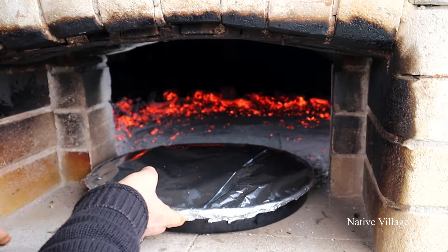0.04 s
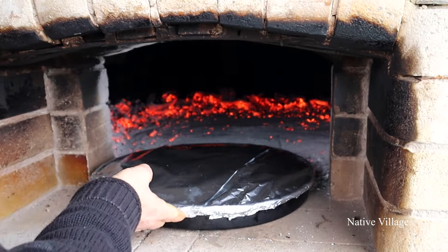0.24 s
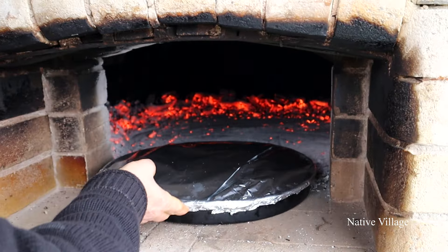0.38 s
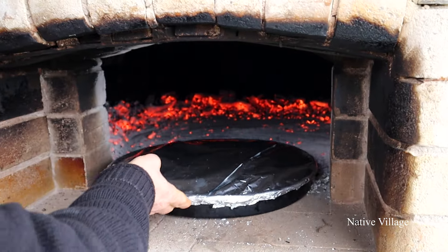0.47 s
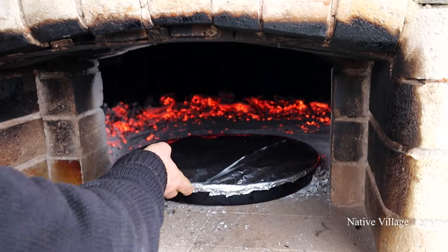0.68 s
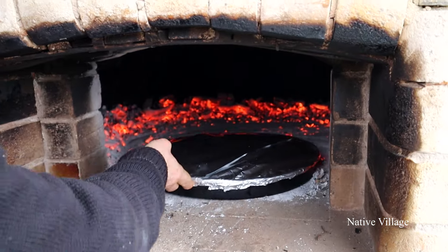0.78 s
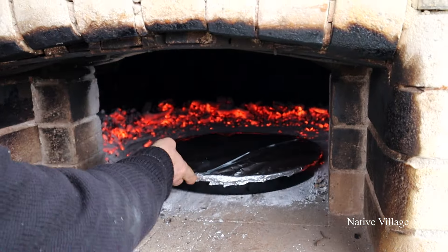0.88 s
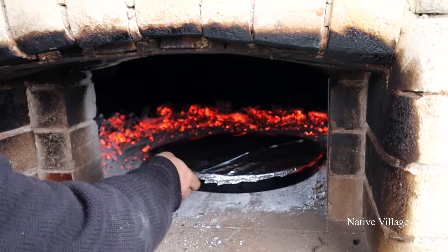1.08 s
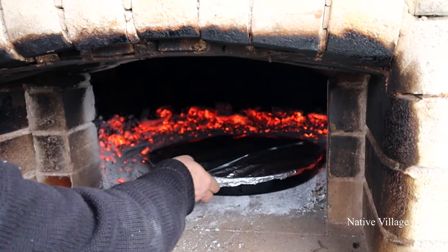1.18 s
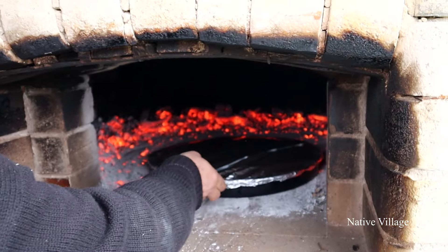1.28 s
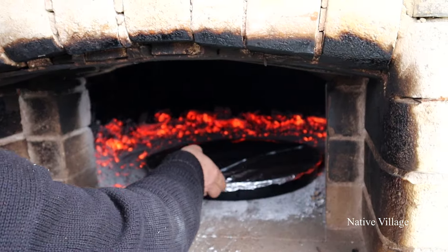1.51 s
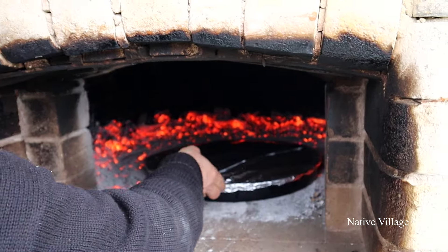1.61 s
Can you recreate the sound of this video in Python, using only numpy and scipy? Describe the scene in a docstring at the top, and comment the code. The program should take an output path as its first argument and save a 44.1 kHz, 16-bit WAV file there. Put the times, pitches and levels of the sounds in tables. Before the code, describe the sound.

Close up in a quiet room, a metal pan slides into a brick oven with one gritty, hissing scrape, full of small crunches, bumps and faint ringing. Soft cloth swishes come before and after it, over a low hum.

```python
"""A heavy metal pan is pushed over the ashy floor of a brick oven, close to the microphones.
Grit breaks under it in thousands of tiny clicks that growl, grind and hiss. The pan catches on
the bricks, judders, rings faintly and comes to rest, and the oven's arched roof echoes briefly.
A sleeve rustles before and after, over a quiet room with a low hum."""
import sys
import numpy as np
from scipy import signal
from scipy.fft import rfft, irfft, next_fast_len
from scipy.io import wavfile

SR = 44100
rng = np.random.default_rng(int(sys.argv[2]) if len(sys.argv) > 2 else 0)


def master_out(mix):
    """Clip the mix to full scale and print it as 16-bit PCM to the path in sys.argv[1]."""
    frames = np.transpose(np.atleast_2d(mix))
    ceiling = np.clip(frames, -1, 1)
    pcm = np.round(ceiling * 32767).astype(np.int16)
    wavfile.write(sys.argv[1], SR, pcm)


N = 72765
T = np.arange(N) / SR
FFT_SIZE = next_fast_len(N + 16384)
HZ = np.fft.rfftfreq(FFT_SIZE, 1 / SR)

# How loud the three parts of the scrape are. Each row: time in seconds, level in dB.
GRIND_LEVELS = [(.13, -54.5), (.19, -43.5), (.235, -36), (.295, -36.5), (.365, -34.5), (.41, -36),
                (.47, -35), (.495, -40), (.6, -33.5), (.685, -35), (.745, -31.5), (.775, -29.5),
                (.82, -27.5), (.855, -31), (.885, -29.5), (.915, -29.5), (.97, -30.5), (1.035, -32.5),
                (1.09, -42.5), (1.14, -50.5), (1.21, -85)]
HISS_LEVELS = [(.14, -58), (.175, -42.5), (.215, -35.5), (.243, -29), (.295, -44.5), (.335, -31),
               (.372, -23.5), (.412, -40.5), (.485, -40.5), (.53, -37), (.6, -37.5), (.64, -39),
               (.735, -34), (.765, -32.5), (.85, -36.5), (.89, -32.5), (.97, -38), (1.035, -32),
               (1.09, -42), (1.14, -53), (1.21, -60)]
GROWL_LEVELS = [(.16, -54.5), (.29, -45), (.36, -39), (.5, -40), (.61, -43), (.69, -47), (.8, -42),
                (.91, -44), (.985, -36), (1.03, -55.5), (1.11, -47), (1.2, -93)]
# Their tone colours, from bass to treble. Each row: frequency in Hz, relative level in dB.
GRIND_COLOUR = [(100, -27), (400, -17), (750, -7.5), (1100, -0.5), (1400, -1), (1850, -1), (2350, -1.5),
                (2650, -4.5), (3050, -3.5), (4500, -6.5), (8000, -13.5), (16000, -73)]
HISS_COLOUR = [(500, -19.5), (2200, -2.5), (3600, -5.5), (5000, -4.5), (6500, -2.5), (8300, -3.5),
               (10400, -2), (11300, -7.5), (12500, -10), (14000, -24), (15700, -41)]
GROWL_COLOUR = [(20, -9), (70, -13), (150, -6.5), (190, 4), (270, -10.5), (370, -1.5), (500, -3.5),
                (800, 0), (1200, 1), (3000, -57), (16000, -84)]
# The notes the pan rings with. Each row: pitch in Hz, relative level in dB.
PAN_NOTES = [(738, -9), (975, -33), (1620, -8.5), (1798, -4.5), (1863, -10), (2063, -26), (2950, -7.5),
             (3114, -30), (3548, -32)]
# How freely the pan rings. Each row: time in seconds, gain in dB.
RING_FREEDOM = [(.2, -18), (.7, -15.5), (.82, -6), (.93, -5.5), (1.1, -12)]
# The pan catches on the bricks. Each row: time in seconds, grinding in dB, hiss in dB,
# the rim's first and second pitch in Hz, ring level in dB.
CATCHES = [(.165, -48, -32.5, 1916, 1100, -55), (0.244, -31.5, -24.5, 1065, 894, -28),
           (.28, -42, -30.5, 2411, 1680, -33.5), (.316, -39, -26, 2282, 2960, -31),
           (0.352, -25.5, -24.5, 2254, 1336, -30), (0.3977, -27, -24, 3200, 1050, -27),
           (.428, -25.5, -22.5, 3680, 1134, -28), (.46, -26.5, -32, 1105, 1819, -27),
           (0.502, -27.5, -23, 1923, 1130, -31), (0.522, -29, -52, 1948, 1258, -36.5),
           (0.5575, -29.5, -28, 2293, 1022, -33), (0.593, -29, -36, 3100, 2000, -40),
           (0.6102, -26.5, -24.5, 3570, 1330, -27), (.645, -30, -30, 1076, 1945, -33.5),
           (0.656, -24.5, -47, 1320, 2200, -27.5), (.724, -31, -40, 1421, 2242, -33),
           (0.772, -41, -23.5, 1884, 1367, -28), (.803, -27, -44, 1819, 1988, -28),
           (0.84, -29, -39, 1787, 1534, -26), (0.877, -20.5, -35, 510, 1612, -28),
           (0.887, -30, -42, 1862, 1636, -26.5), (0.9, -26.5, -31, 1851, 1300, -36),
           (0.953, -56, -35, 1625, 760, -29.5)]
# Heavier catches bump the oven floor. Each row: time in seconds, level in dB.
THUDS = [(0.429, -31.5), (0.465, -30.5), (.61, -33.5), (.653, -39.5), (0.732, -32), (0.77, -29),
         (.877, -29.5)]
# The tone of a bump. Each row: frequency in Hz, relative level in dB.
THUD_COLOUR = [(200, -23.5), (470, -3.5), (1000, -7.5), (4000, -57)]
# The pan sticks and slips. Each row: time in seconds, slips per second, level in dB.
JUDDER = [(.3, 113, -63), (0.364, 128, -50.5), (0.439, 58, -67), (0.559, 78, -67), (.612, 130, -47.5),
          (.7, 115, -49), (.77, 117, -46), (.84, 123, -54), (.91, 115, -52.5), (1.081, 123, -62)]
# The oven's echo. Each row: frequency in Hz, seconds to fade by 60 dB.
ECHO_FADE = [(150, 0.4), (1500, 0.34), (5000, 0.22), (14000, 0.29)]
# The sleeve moves. Each row: peak time, rise and fall, all in seconds, then level in dB.
RUSTLES = [(.012, 0.027, 0.05, -43.5), (0.079, 0.0051, 0.012, -40), (.12, 0.07, 0.074, -47.5),
           (1.173, 0.017, 0.0078, -42.5), (1.544, 0.033, 0.01, -54.5), (1.556, 0.0025, 0.016, -48),
           (1.604, 0.0019, 0.0098, -46), (1.62, 0.0057, 0.016, -44), (1.638, 0.0066, 0.017, -48.5)]
# The tone of the cloth and of the room's air. Each row: frequency in Hz, relative level in dB.
CLOTH_COLOUR = [(60, -36), (400, 4.5), (1200, 2), (2700, 5), (3500, 0.5), (6000, 1), (7800, 2.5),
                (10300, 5.5), (11800, -3.5), (13500, -12), (15700, -31)]
AIR_COLOUR = [(20, -26), (45, -7.5), (75, -12.5), (180, -9), (400, -14), (900, -16.5), (2200, -19.5),
              (4000, -26.5), (7000, -35.5), (10500, -35.5), (12500, -45), (15500, -60)]
# The room's hum. Each row: pitch in Hz, level in dB.
HUM = [(100, -58), (300, -70.5)]
# How alike left and right are. Each row: frequency in Hz, likeness (1 or more: same, -1: opposite).
PAN_LIKENESS = [(60, 6), (700, 0.83), (1800, 0.82), (2800, 0.27), (4500, 0.5), (6000, -0.64), (8500, 0),
                (11000, 0.22), (15000, 1.8)]
SLEEVE_LIKENESS = [(100, 0.62), (600, 0.069), (3000, 0.12), (12000, 0.46)]
AIR_LIKENESS = [(60, 1), (200, 0.14), (500, 0.043), (2000, 0.033)]
# How far the left side runs ahead. Each row: frequency in Hz, lead in radians.
PAN_AND_AIR_LEAD = [(60, 0.66), (1800, 0.093), (3300, 0.55), (4600, 1.2), (6300, 1.23), (10000, 1.85),
                    (15000, 5)]
SLEEVE_LEAD = [(100, -0.5), (1400, -1), (2600, 0.5), (12000, 4)]
# Which side the pan is louder on. Each row: frequency in Hz, left minus right in dB.
PAN_BALANCE = [(100, -0.2), (900, -1), (2600, -2), (4600, 0.5), (6200, -2.5), (7700, -0.5), (10300, 2),
               (12000, -0.5)]

CATCH_RISE_S, CRUNCH_FALL_S, RIM_FALL_S, THUD_FALL_S = .002, .0027, .0043, .0045


def scrape():
    """The sliding pan crushes grit, which grinds, growls and hisses; the grinding shakes the pan."""
    grind = grains(per_second=9000, spread_db=2.5, clump_db=1.5) * level(GRIND_LEVELS)
    growl = grains(per_second=5000, spread_db=2.5, clump_db=1.5) * level(GROWL_LEVELS)
    hiss = grains(per_second=14000, spread_db=3.2, clump_db=1.9) * level(HISS_LEVELS)
    ring = pan_ring(grind * gain(np.interp(T, *np.transpose(RING_FREEDOM))))
    grit = colour(grind, GRIND_COLOUR) + colour(growl, GROWL_COLOUR) + colour(hiss, HISS_COLOUR)
    return shifting_contact(grit) + ring


def pan_ring(force, fade_s=.24, bend=.006):
    """Scraping sets the pan's notes ringing; their pitch wavers as the load bends the pan."""
    t = np.arange(SR // 2) / SR
    fade = gain(-60 * t / fade_s)
    notes = sum(gain(db) * np.sin(2 * np.pi * hz * t) for hz, db in PAN_NOTES)
    one_tap = notes * fade * np.sqrt(2) / np.linalg.norm(fade)
    bent_time = T + np.cumsum(bend * drift(smooth_s=.03)) / SR
    return np.array([np.interp(bent_time, T, signal.fftconvolve(side, one_tap)[:N]) for side in force])


def shifting_contact(grit, patch_db=2.0, patch_s=.004, patch_hz=220):
    """The spots where the pan touches keep moving, so the scrape's tone shifts in small patches."""
    hz, t, spectrum = signal.stft(grit, SR, nperseg=512, noverlap=384)
    steps = np.arange(-12, 13)
    blur = np.outer(np.exp(-(steps * hz[1] / patch_hz) ** 2), np.exp(-(steps * t[1] / patch_s) ** 2))
    patches = normalise(signal.fftconvolve(rng.standard_normal(spectrum.shape[1:]), blur, "same"))
    spectrum *= normalise(gain(patch_db * patches))
    return signal.istft(spectrum, SR, nperseg=512, noverlap=384)[1][:, :N]


def catches():
    """Each catch on the bricks is a sharp crunch of grit and a short ring; heavier ones also thud."""
    grind = sum(gain(db) * swell(s, CATCH_RISE_S, CRUNCH_FALL_S) for s, db, *_ in CATCHES)
    hiss = sum(gain(db) * swell(s, CATCH_RISE_S, CRUNCH_FALL_S) for s, _, db, *_ in CATCHES)
    thud = sum(gain(db) * swell(s, CATCH_RISE_S, THUD_FALL_S) for s, db in THUDS)
    layers = [(grind, GRIND_COLOUR), (hiss, HISS_COLOUR), (thud, THUD_COLOUR)]
    return sum(colour(burst * rng.standard_normal((2, N)), tone) for burst, tone in layers) + rim_rings()


def rim_rings(second_note_db=-3.5):
    """Each catch rings two notes of the pan's rim, which the load quickly muffles."""
    rings = np.zeros((2, N))
    for s, _, _, first_hz, second_hz, db in CATCHES:
        phase = rng.random((2, 2, 1))
        first = np.sin(2 * np.pi * (first_hz * T + phase[0]))
        second = gain(second_note_db) * np.sin(2 * np.pi * (second_hz * T + phase[1]))
        loudness = gain(db) * swell(s - CATCH_RISE_S / 2, CATCH_RISE_S, RIM_FALL_S)
        rings += np.sqrt(2) * loudness * (first + second)
    return rings


def judder():
    """The pan sticks and slips fast enough to make a low drone."""
    times, slip_rates, db = np.transpose(JUDDER)
    slips_so_far = np.cumsum(np.interp(T, times, slip_rates)) / SR
    return np.sqrt(2) * level(np.c_[times, db]) * np.sin(2 * np.pi * slips_so_far)


def oven_echo(sound, patterns=12, echo_db=-10.5):
    """Adds the oven's short echo, blending several reflection patterns so it sounds smooth and even."""
    progress = T / T[-1] * (patterns - 1)
    echo = np.zeros((2, N))
    for pattern in range(patterns):
        share = np.sqrt(np.maximum(1 - abs(progress - pattern), 0))
        echo += signal.fftconvolve(sound * share, brick_reflections(), axes=1)[:, :N]
    return sound + gain(echo_db) * echo


def brick_reflections(per_second=3000, gap_s=.002):
    """Sound bounces off the arched bricks as a dense, quickly fading pattern of clicks."""
    length = SR // 3
    bounces = random_clicks(per_second, length) * (np.arange(length) > gap_s * SR)
    hz, t, spectrum = signal.stft(bounces, SR, nperseg=256)
    fade = gain(-60 * t / look_up(ECHO_FADE, hz)[:, None])
    tail = signal.istft(spectrum * fade, SR, nperseg=256)[1]
    return tail / np.linalg.norm(tail, axis=1, keepdims=True)


def sleeve():
    """Knitted cloth brushes in short swishes."""
    motion = np.sqrt(sum((gain(db) * swell(s, rise, fall)) ** 2 for s, rise, fall, db in RUSTLES))
    fibres = grains(per_second=14000, spread_db=2.5, clump_db=.8, clump_s=.0041)
    return microphones(colour(motion * fibres, CLOTH_COLOUR), SLEEVE_LIKENESS, SLEEVE_LEAD)


def room(air_db=-53.5):
    """Soft, steady air and a low hum fill the room."""
    air = microphones(colour(rng.standard_normal((2, N)), AIR_COLOUR), AIR_LIKENESS, PAN_AND_AIR_LEAD)
    hum = sum(np.sqrt(2) * gain(db) * np.sin(2 * np.pi * (hz * T + rng.random())) for hz, db in HUM)
    return gain(air_db) * air + hum


def microphones(pair, likeness, lead):
    """Blends two unrelated signals into what two microphones close together pick up."""
    first, second = rfft(pair, FFT_SIZE)
    blend = np.arccos(np.clip(look_up(likeness), -1, 1)) / 2
    shared, apart = np.cos(blend) * first, np.sin(blend) * second
    left, right = shared + apart, (shared - apart) * np.exp(-1j * look_up(lead))
    return irfft(np.array([left, right]), FFT_SIZE)[:, :N]


def grains(per_second, spread_db, clump_db, clump_s=.004):
    """Two streams of tiny clicks of uneven size that swell together in clumps."""
    sizes = gain(spread_db * np.minimum(rng.exponential(1, (2, N)), 4))
    return normalise(sizes * random_clicks(per_second, N) * gain(clump_db * drift(clump_s)))


def random_clicks(per_second, length):
    """Two streams of equally strong clicks at random moments."""
    return rng.choice([-1., 1.], (2, length)) * (rng.random((2, length)) < per_second / SR)


def drift(smooth_s):
    """A smooth random wobble with a typical size of 1."""
    spectrum = rfft(rng.standard_normal(FFT_SIZE)) * np.exp(-(HZ * smooth_s) ** 2)
    return normalise(irfft(spectrum, FFT_SIZE)[:N])


def swell(peak_s, rise_s, fall_s):
    """Builds up to a peak and dies away."""
    t = T - peak_s
    return np.exp(-(np.minimum(t, 0) / rise_s) ** 2 - np.maximum(t, 0) / fall_s)


def level(rows):
    """Joins rows of seconds and dB into a volume curve, silent before and after."""
    return gain(np.interp(T, *np.transpose(rows), left=-120, right=-120))


def colour(sound, rows):
    """Shapes bass and treble while keeping the overall level of white noise."""
    return irfft(rfft(sound, FFT_SIZE) * normalise(gain(look_up(rows))), FFT_SIZE)[..., :N]


def look_up(rows, hz=HZ):
    """Reads between a table's rows, with frequency spaced like musical pitch."""
    row_hz, values = np.transpose(rows)
    return np.interp(np.log(hz + 1), np.log(row_hz + 1), values)


def gain(db):
    """Turns decibels into a number to multiply by."""
    return 10 ** (np.asarray(db) / 20)


def normalise(x):
    """Scales a signal so its typical size (root mean square) is 1."""
    return x / np.sqrt(np.mean(abs(x) ** 2) + 1e-20)


def scene():
    """Mixes the pan in the oven, the sleeve and the room."""
    pan = microphones(oven_echo(scrape() + catches()), PAN_LIKENESS, PAN_AND_AIR_LEAD)
    balance = gain(np.outer([.5, -.5], look_up(PAN_BALANCE)))
    pan = irfft(rfft(pan, FFT_SIZE) * balance, FFT_SIZE)[:, :N]
    return pan + judder() + sleeve() + room()


def record(dry):
    """Cuts off the highest treble, above 15750 Hz."""
    low_pass = signal.firwin(511, 15750, window=("kaiser", 9), fs=SR)
    return signal.oaconvolve(dry, low_pass[None], "same")


dry = scene()
out = record(dry)
master_out(out)
```